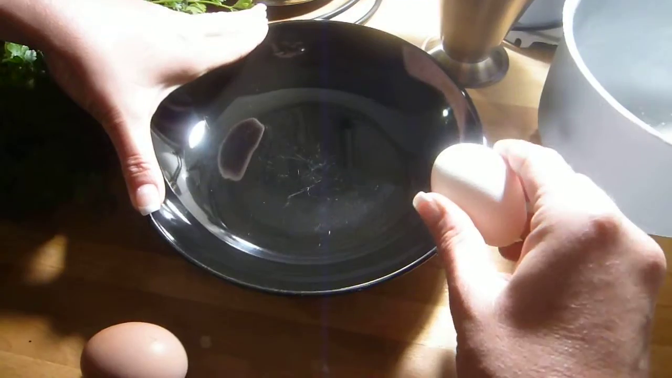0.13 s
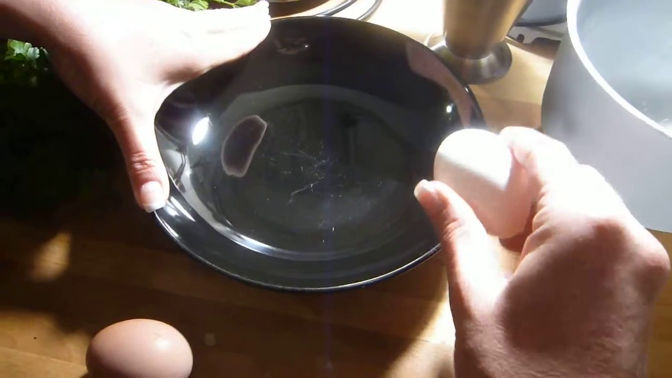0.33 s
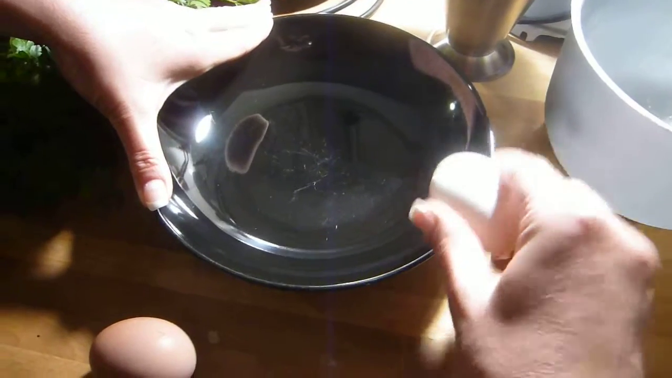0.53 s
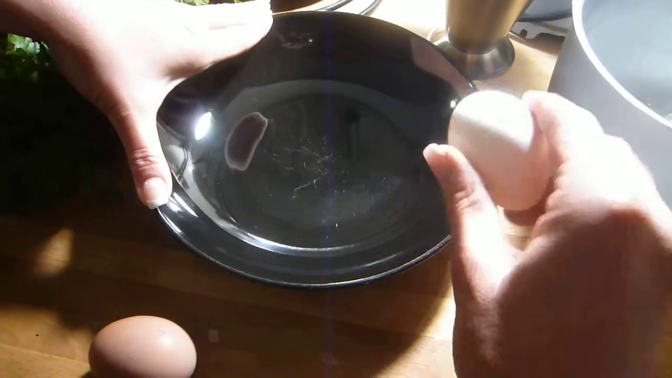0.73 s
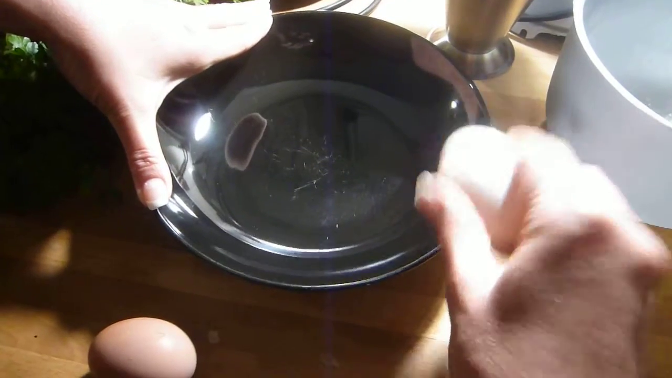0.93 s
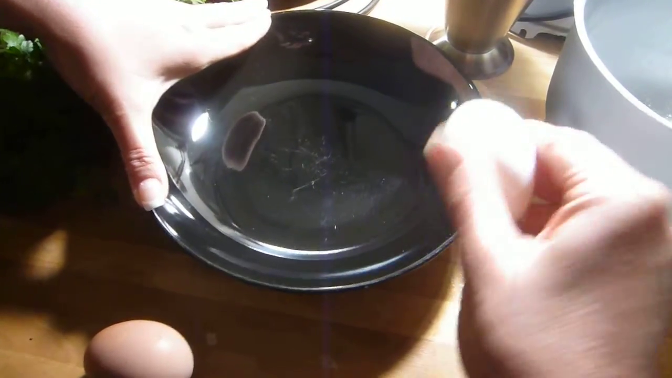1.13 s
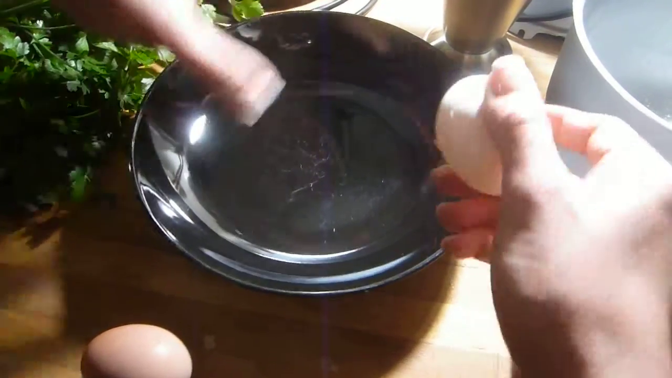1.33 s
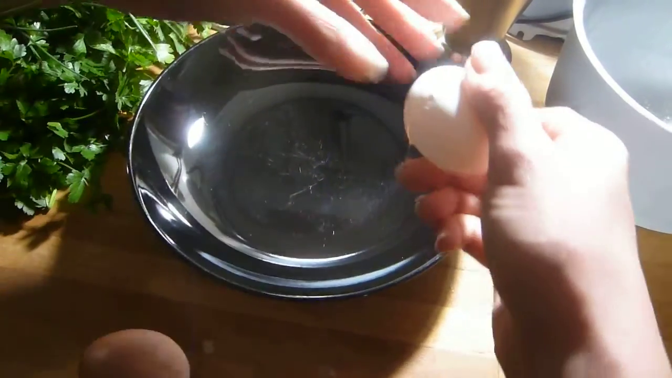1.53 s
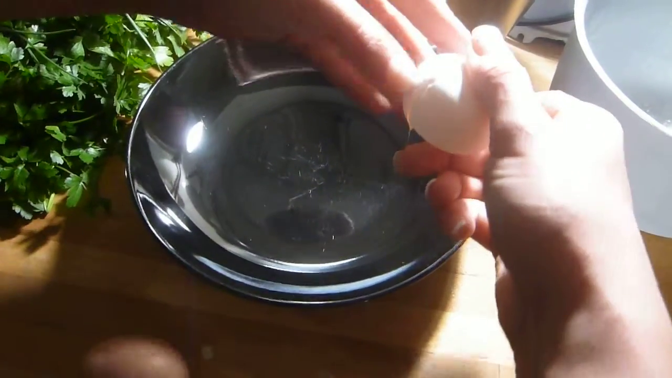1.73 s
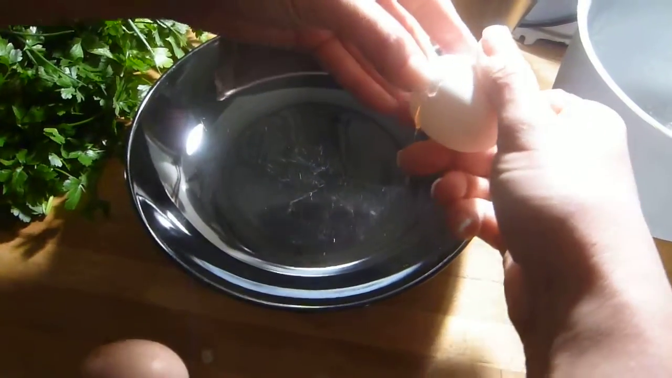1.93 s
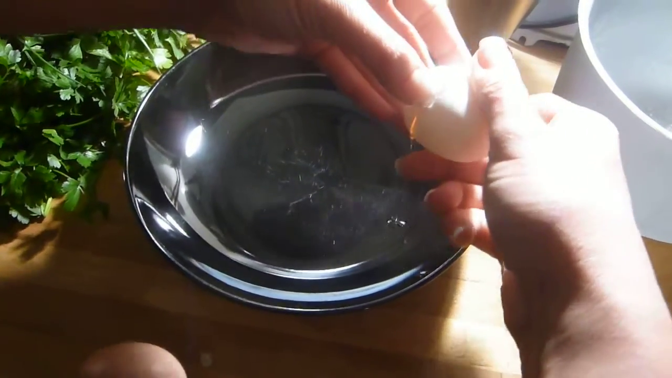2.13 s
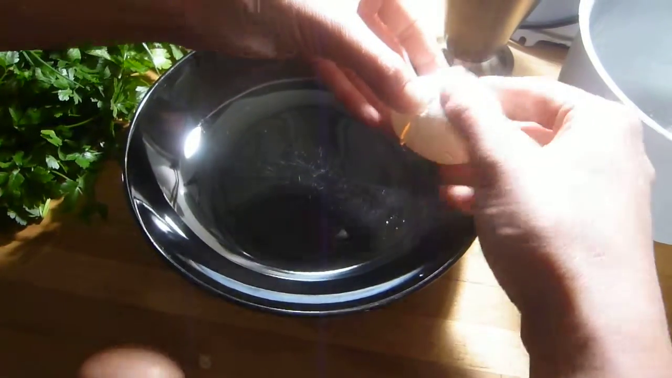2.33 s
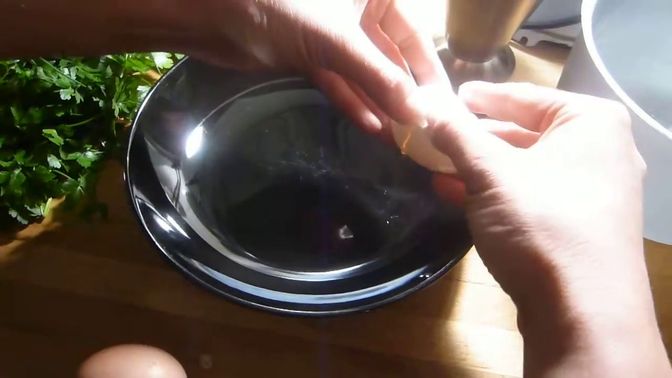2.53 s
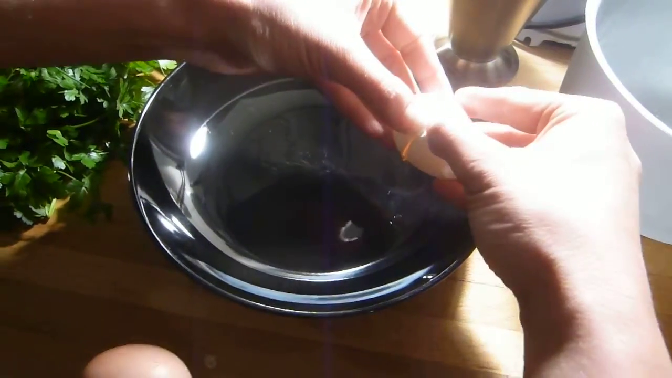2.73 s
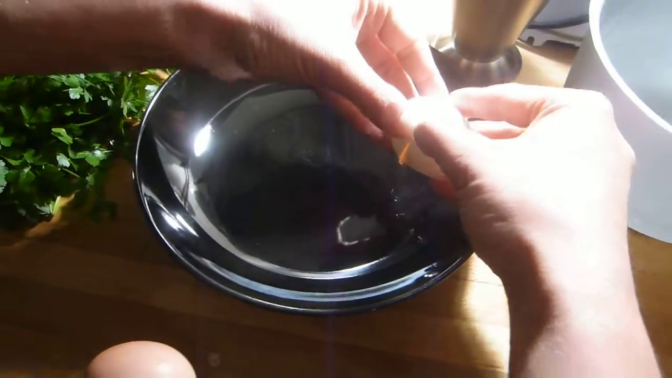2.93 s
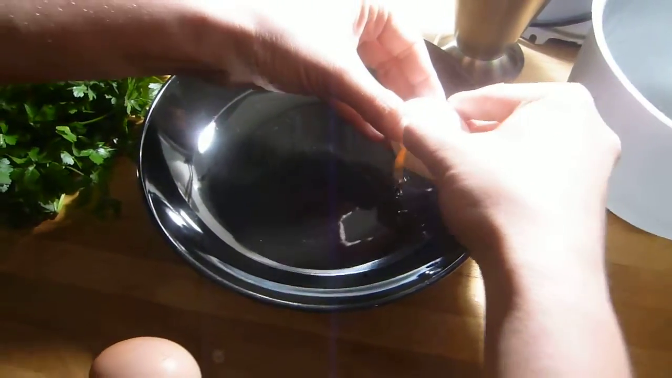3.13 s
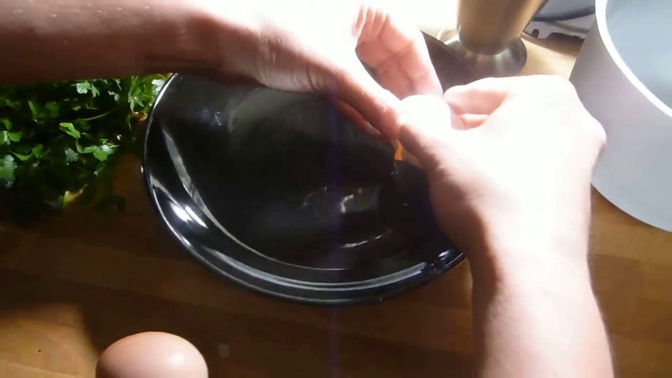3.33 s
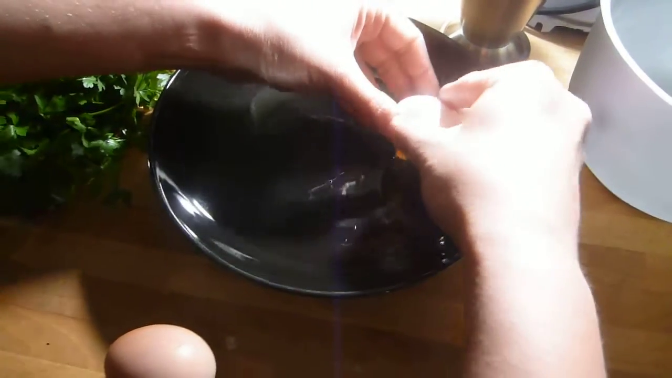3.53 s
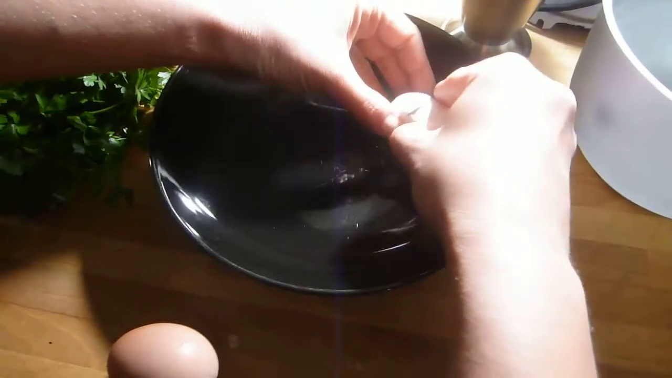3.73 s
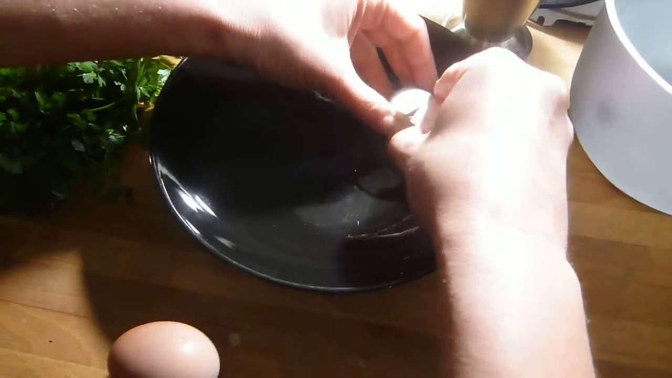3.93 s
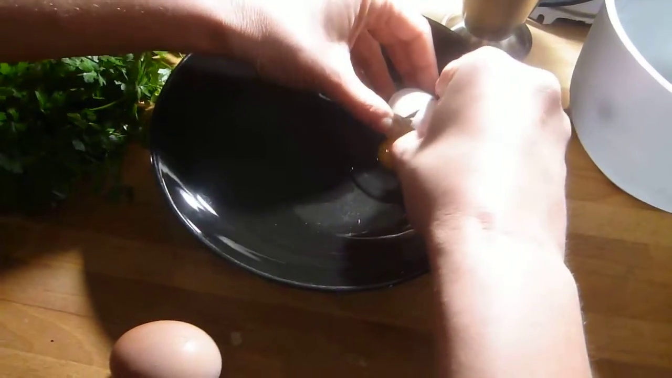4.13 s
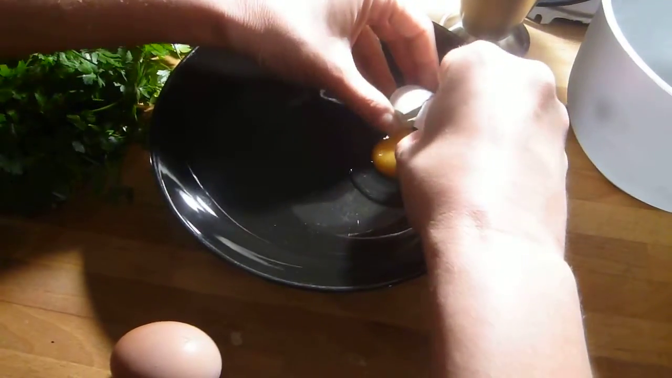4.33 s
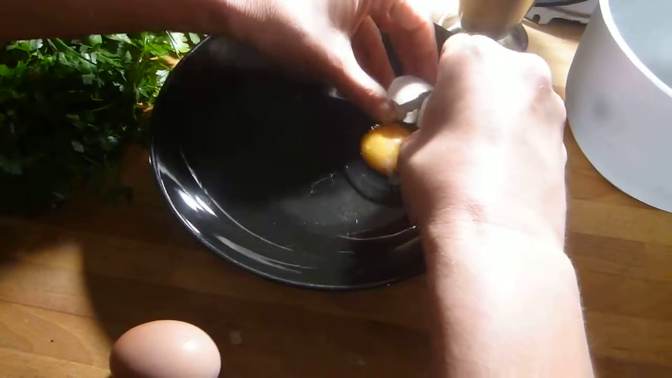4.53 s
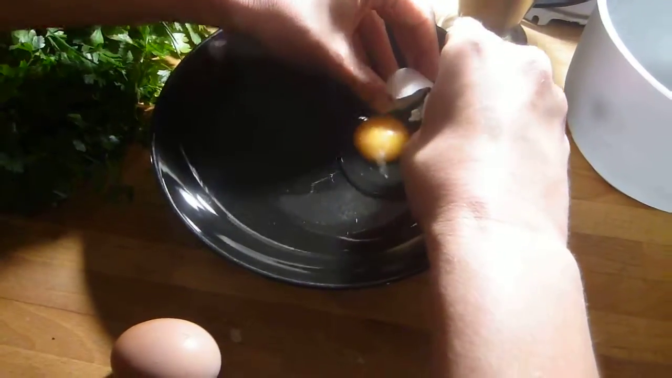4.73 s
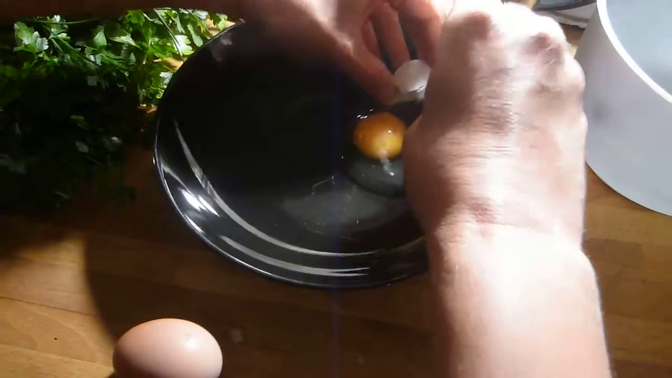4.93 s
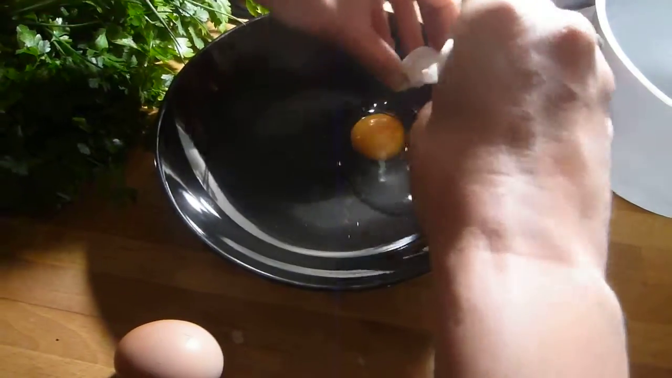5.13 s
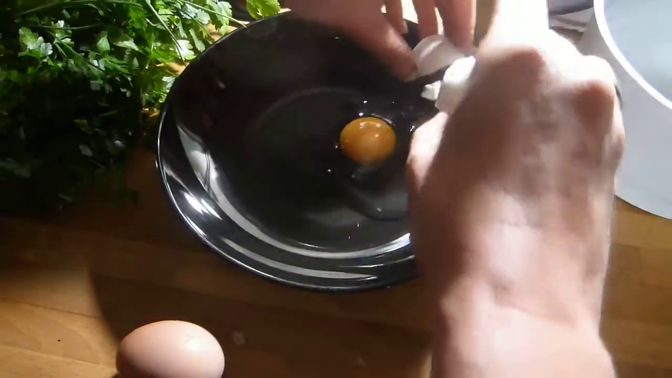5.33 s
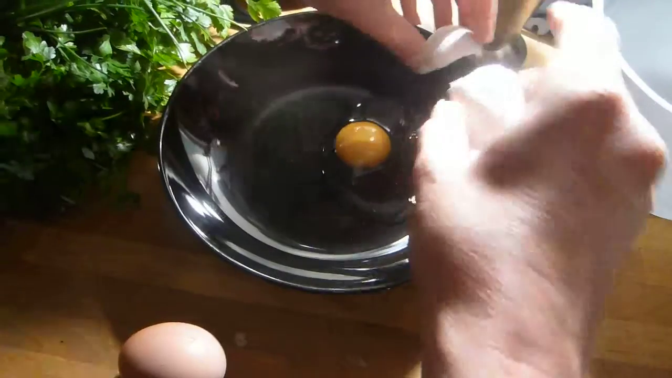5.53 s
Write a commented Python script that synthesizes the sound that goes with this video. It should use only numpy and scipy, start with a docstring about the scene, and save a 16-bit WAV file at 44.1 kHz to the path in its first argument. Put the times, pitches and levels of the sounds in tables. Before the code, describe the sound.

An egg is knocked twice on a plate's rim, then its shell crackles open and the egg slips out with faint wet sounds.

```python
"""Hiss, a faint mechanical rustle and soft handling thuds lead into two knocks of an egg on a plate's rim.
The plate stands on a wooden table: damped modes ring, and the tipped plate drops back with a dull bump.
Thumbs then break the shell open: bursts of tiny clicks excite its resonances, and a few edges ping.
The egg slides out with short wet squelches of resonant noise, among soft damped thuds of the hands.
A small camera close by adds the hiss and rustle, and overloads on the knocks."""
import sys
import numpy as np
from scipy import signal
from scipy.fft import rfft, irfft, next_fast_len
from scipy.io import wavfile

SR = 44100
rng = np.random.default_rng(int(sys.argv[2]) if len(sys.argv) > 2 else 0)


def put_to_file(sound):
    """Save the sound as 16-bit audio at rate SR, in the file named by the first command-line argument."""
    columns = np.atleast_2d(sound).T  # one column per channel
    safe = np.clip(columns, -1, 1)
    whole_steps = np.round(safe * 32767)
    wavfile.write(sys.argv[1], SR, whole_steps.astype(np.int16))


N = 245637
TIME = np.arange(N) / SR


def from_db(db):
    """Decibels to gain."""
    return 10 ** (np.asarray(db) / 20)


def rms_one(x):
    """Scale to unit rms."""
    return x / np.sqrt(np.mean(x ** 2) + 1e-20)


def at_hz(points, hz):
    """Read a table on a log-frequency axis."""
    points = np.array(points)
    return np.interp(np.log(hz + 1e-9), np.log(points[:, 0]), points[:, 1])


def add(out, start_s, sound):
    """Mix a sound in at a time."""
    start = int(round(start_s * SR))
    out[start:start + len(sound)] += sound[:N - start]


def ring(hz, t60_s):
    """One struck mode: a sine that decays by 60 dB in t60_s."""
    t = TIME[:int(2 * t60_s * SR)]
    return np.sin(2 * np.pi * hz * t) * 1000 ** (-t / t60_s)


def thud(hz, cycles):
    """A heavily damped bump whose envelope peaks after the given number of cycles, then dies."""
    age = TIME[:SR // 8] * hz / cycles
    envelope = age * np.exp(1 - age)
    return envelope * np.sin(2 * np.pi * cycles * age)


def swell(length_s):
    """A rounded rise and fall."""
    return np.sqrt(signal.windows.hann(int(length_s * SR)))


def resonate(x, hz, width_hz):
    """A two-pole resonance with gain one on top."""
    radius = np.exp(-np.pi * width_hz / SR)
    zeros = np.array([1, 0, -1]) * (1 - radius * radius) / 2
    poles = [1, -2 * radius * np.cos(2 * np.pi * hz / SR), radius * radius]
    return signal.lfilter(zeros, poles, x)


def noise(spectrum):
    """Steady noise of a given colour, rms one."""
    size = next_fast_len(N)
    hz = np.fft.rfftfreq(size, 1 / SR)
    coloured = rfft(rng.standard_normal(size)) * from_db(at_hz(spectrum, hz))
    return rms_one(irfft(coloured, size)[:N])


def drift(per_s):
    """Random values joined by straight lines, with a spread of about one."""
    return np.interp(TIME * per_s, np.arange(N), rng.standard_normal(N))


def now_and_then(per_s):
    """Times that follow each other at uneven gaps."""
    times = np.cumsum(rng.gamma(3, size=300)) / (3 * per_s)
    return times[times < N / SR]


# how long the kitchen rings on in each register: pitch_hz, t60_s
ROOM_DECAY = [(100, 0.7), (300, 0.33), (1000, 0.32), (3000, 0.18), (8000, 0.047)]


def kitchen(x, wet_db, gap_s, dull_hz):
    """Direct sound plus a duller diffuse tail in which the treble dies first."""
    t, tail = TIME[:SR], 0
    edges = np.geomspace(60, 9000, 11)
    for low, high in zip(edges, edges[1:]):
        hz = np.sqrt(low * high)
        band_filter = signal.butter(2, [low, high], "band", fs=SR, output="sos")
        band = signal.sosfilt(band_filter, rng.standard_normal(SR))
        decay = 1000 ** (-t / at_hz(ROOM_DECAY, hz))
        tail = tail + band * decay / np.linalg.norm(decay) / np.hypot(1, hz / dull_hz)
    tail = tail * np.minimum(t / gap_s, 1)  # fades in behind the direct sound
    return x + from_db(wet_db) * signal.fftconvolve(x, tail)[:N]


# colour of the camera's steady hiss: pitch_hz, relative level_db (per Hz)
HISS_COLOUR = [(10, -28), (30, 3), (60, 4.5), (140, 3.5), (260, -3.5), (480, -4.5), (900, -14),
               (1400, -12.5), (1900, -15), (2600, -19.5), (3500, -21.5), (7300, -24.5), (7900, -29),
               (8400, -33.5)]


def hiss(level_db):
    """The camera's own steady bed: coloured noise."""
    return from_db(level_db) * noise(HISS_COLOUR)


# colour of the mechanical rustle: pitch_hz, relative level_db (per Hz)
RUSTLE_COLOUR = [(300, -49), (550, -5.5), (890, 4), (1010, -4), (1150, 4.5), (1290, -7.5), (1550, -2.5),
                 (1680, -12), (1900, -5), (2250, -9.5), (2600, -20), (4000, -22.5), (8000, -66.5)]
# strength of the rustle's spurts along the scene: time_s, level_db
SPURT_STRENGTH = [(0.15, -47.5), (0.75, -55), (2.0, -50.5), (2.85, -55), (3.4, -49), (3.8, -58.5),
                  (4.15, -46), (4.5, -51.5), (5.0, -52.5), (5.57, -49.5)]
SPURTS_PER_S, SPURT_S, SPURT_SPREAD_DB = 18, 0.012, 0.8  # rate, typical length, spread of strength


def rustle(idle_db, flutter_db, flutter_per_s, grain_db, attack_s):
    """The camera's mechanism whispers unevenly and comes in grainy spurts that start abruptly."""
    gain = from_db(idle_db + flutter_db * np.tanh(drift(flutter_per_s)))
    t = TIME[:SR // 8]
    for start_s in now_and_then(SPURTS_PER_S):
        typical_db = np.interp(start_s, *np.transpose(SPURT_STRENGTH))
        level_db = typical_db + SPURT_SPREAD_DB * rng.standard_normal()
        length_s = SPURT_S * 2 ** rng.uniform(-1.02, 1)
        spurt = np.minimum(t / attack_s, 1) * np.exp(-(t / length_s) ** 2)
        add(gain, start_s, from_db(level_db) * spurt)
    grain = from_db(grain_db * drift(500))
    return gain * grain * noise(RUSTLE_COLOUR)


# soft thuds of the hands and the egg: start_s, level_db, pitch_hz
SOFT_THUDS = [(0.071, -29, 167), (0.127, -30, 137), (2.238, -34.5, 141), (2.4786, -24, 240),
              (3.083, -24.5, 172), (3.123, -30.5, 179), (3.2313, -27, 148), (3.248, -23, 154),
              (3.413, -33, 153), (3.586, -37.5, 160), (4.080, -32, 204), (4.721, -32.5, 140),
              (5.01, -32.5, 224), (5.401, -29.5, 230)]
# the plate humming faintly as a hand leans on it: start_s, level_db, length_s
PLATE_LEANS = [(2.677, -49, 0.071), (4.691, -48, 0.093)]
PLATE_HUM_HZ = 399.3
SETTLE_S, SETTLE_DB, SETTLE_PITCH = 0.0118, -12.5, 0.63  # flesh settling: delay, level, pitch ratio
FIDGETS_PER_S, FIDGET_DB, FIDGET_HZ = 3, -42, 150  # small shifts of the grip: rate, typical level, pitch


def hands():
    """Fingers shift and the soft egg gives way: dull, short thuds, and a faint hum of the plate."""
    out = np.zeros(N)
    fidgets = []
    for start_s in now_and_then(FIDGETS_PER_S):
        level_db = FIDGET_DB + 2 * rng.standard_normal()
        fidgets.append((start_s, level_db, FIDGET_HZ * 2 ** rng.uniform(-0.51, 0.45)))
    for start_s, level_db, hz in SOFT_THUDS + fidgets:
        add(out, start_s, from_db(level_db) * thud(hz, cycles=0.41))
        settling = thud(hz * SETTLE_PITCH, cycles=0.42)
        add(out, start_s + SETTLE_S, from_db(level_db + SETTLE_DB) * settling)
    for start_s, level_db, length_s in PLATE_LEANS:
        shape = swell(length_s)
        hum = np.sin(2 * np.pi * PLATE_HUM_HZ * TIME[:len(shape)])
        add(out, start_s, from_db(level_db) * shape * hum)
    return out


# the egg slipping wetly out of the shell: start_s, level_db, length_s, pitch_hz
WET_SLIPS = [(3.909, -43, 0.0066, 960), (4.296, -38, 0.016, 925), (4.337, -43.5, 0.025, 940),
             (4.382, -51, 0.057, 950), (4.943, -43.5, .012, 910), (5.075, -46, 0.02, 1100)]


def squelches(width_hz):
    """Sticky egg white tears and briefly rings the hollow of the shell."""
    out = np.zeros(N)
    for start_s, level_db, length_s, hz in WET_SLIPS:
        shape = swell(length_s)
        tearing = rng.standard_normal(SR // 10)
        for _ in range(2):  # two passes sharpen the resonance
            tearing = resonate(tearing, hz, width_hz)
        # the end of the burst is used, where the resonance has built up
        add(out, start_s, from_db(level_db) * shape * rms_one(tearing[-len(shape):]))
    return out


# free edges of shell ringing as they let go: start_s, level_db, pitch_hz, t60_s
SHELL_EDGES = [(3.0814, -20, 914, 0.027), (3.6171, -38, 3840, 0.035), (3.6173, -41, 4980, 0.022)]


def shards():
    """Broken edges give very short pings."""
    out = np.zeros(N)
    for start_s, level_db, hz, t60_s in SHELL_EDGES:
        add(out, start_s, from_db(level_db) * ring(hz, t60_s))
    return out


# resonances of the shell held in the fingers: pitch_hz, width_hz, relative level_db
SHELL_MODES = [(396, 33, 4.5), (650, 85, 2.5), (948, 103, 6.5), (1402, 165, 4.5), (1916, 180, 3.5),
               (2970, 610, 2.5), (4020, 350, 1.5), (5040, 620, -1), (7240, 1500, -14.5)]


def shell(fractures, level_db, crumble_share, scatter_db, flakes_db, flakes_s, flakes_per_s):
    """A fracture is a click, a spray of tinier ones and late flakes; each rings the shell differently."""
    out, t = np.zeros(N), TIME[:SR // 10]
    middle_hz = np.median(np.array(SHELL_MODES)[:, 0])
    for start_s, fracture_db, crumble_s, tilt_db in fractures:
        spray = rng.laplace(size=len(t)) * np.exp(-t / crumble_s)
        flake_sizes = rng.standard_normal(len(t))
        flake_hits = rng.random(len(t)) < flakes_per_s / SR
        flakes = flake_sizes * flake_hits * np.exp(-t / flakes_s)
        force = crumble_share * spray / np.linalg.norm(spray) + from_db(flakes_db) * flakes
        force[0] += 1  # the first click
        for m, (hz, width_hz, mode_db) in enumerate(SHELL_MODES):
            tilted_db = mode_db + tilt_db * np.log2(hz / middle_hz)
            gain_db = level_db + fracture_db + tilted_db + scatter_db * rng.standard_normal()
            add(out, start_s, (-1) ** m * from_db(gain_db) * resonate(force, hz, width_hz))
    return out


# the shell snapping under the fingers: start_s, relative level_db, crumble_s, tilt_db (per octave)
FINGER_SNAPS = [(0.5516, -37.5, .0011, -1), (2.0759, -45.5, 0.0023, 5.5), (3.063, -32, 0.002, -7),
                (3.0681, -18, 0.0014, -1.3), (3.0812, -13, .0018, -1.5), (3.0862, -20, .0036, -4),
                (3.0943, -18.5, 0.0013, -3.5), (3.1266, -21.5, 0.0031, -2.2), (3.5765, -39, 0.00088, 2.5),
                (3.591, -38, 0.0038, -5), (3.6164, -26, 0.0092, -2), (5.2220, -36, 0.0015, -2)]
RUN_ON_S, RUN_ON_LOSS_DB = .012, 18.5  # mean gap between running steps, loss at the first step


def running_cracks(count):
    """Every snap is followed by weaker ones as the crack runs on in smaller steps."""
    gaps = RUN_ON_S * rng.uniform(.5, 1.5, (len(FINGER_SNAPS), count))
    after = []
    for (start_s, snap_db, crumble_s, tilt_db), row in zip(FINGER_SNAPS, gaps):
        for k, delay_s in enumerate(np.cumsum(row)):
            level_db = snap_db - RUN_ON_LOSS_DB * np.sqrt(k + 1)
            after.append((start_s + delay_s, level_db, crumble_s, tilt_db))
    return FINGER_SNAPS + after


def snaps():
    """Thumbs break the shell: crisp fractures with plenty of flakes."""
    return shell(running_cracks(count=3), level_db=14, crumble_share=1.1, scatter_db=.4,
                 flakes_db=-23, flakes_s=.011, flakes_per_s=2000)


# the shell caving in against the rim: start_s, relative level_db, crumble_s, tilt_db (per octave)
RIM_CRUSHES = [(0.4852, -2, .0012, -3.5), (0.4872, 0, 0.002, -8), (0.9865, -11.5, .002, -7.5),
               (0.9895, -11, 0.0054, 1), (0.9940, -14, .0015, -1)]


def crushes():
    """The shell caves in on the rim: strong fractures with very faint flakes."""
    return shell(RIM_CRUSHES, level_db=7.5, crumble_share=1.0, scatter_db=0.5,
                 flakes_db=-49.5, flakes_s=0.0071, flakes_per_s=1000)


# two knocks and the drop: start_s, body_db, thud_db, thud_hz, rebound_s (delay after the blow),
# rebound_db (relative to the thud), contact_s, damp_s (time for the hand to damp it)
PLATE_BLOWS = [(0.4862, 0, -0.5, 698, 0.019, -4.5, 0.00022, 0.22),
               (0.9897, -3, -1.5, 573, 0.015, -3.5, 0.001, 0.19),
               (1.1960, -0.5, -24.5, 502, 0.00764, 9.5, 0.0031, 0.18)]
# plate and table together, each blow landing elsewhere: pitch_hz, t60_s,
# then level_db (relative to body_db) in the first knock, second knock and drop
BODY_MODES = [(48, 0.88, -31.5, -33, -52), (63.5, .6, -40, -64, -60), (109.2, 0.84, -39.5, -46.5, -40.5),
              (134.4, 0.54, -36.5, -25, -29.5), (161.6, 0.38, -31, -24.5, -33.5),
              (204, 0.71, -23.5, -24, -33), (191.6, 0.22, -20.5, -8.5, -32.5), (232, 0.39, -15.5, -17, -20),
              (252.4, 0.55, -26.5, -23, -30.5), (276, 0.57, -17, -25.5, -25), (309, 1, -31.5, -23, -33.5),
              (331, 0.6, -24, -20.5, -29.5), (400.6, 0.19, -21, -6, -18), (426.2, 0.16, -10, -8, -17.5),
              (499, 0.15, -28, -46, -43), (495.5, 0.15, -16.5, -16, -37), (606, 1, -52.5, -52, -39.5),
              (609, 0.27, -17, -17.5, -41.5), (614, 0.067, -8.5, -47, -17.5), (671, 0.24, -17.5, -33, -39),
              (750, 0.029, -26, -19, -38), (785, 0.048, -17, -15.5, -27), (850, 0.16, -29, -40, -53),
              (952.6, 0.22, -23.5, -23.5, -45.5), (1062, 0.1, -25, -23.5, -45.5),
              (1168, 0.06, -20, -19, -71), (1248, 0.037, -6, -14.5, -78), (1442, 0.11, -31, -40, -71)]
# the plate's rim, struck only by the egg: pitch_hz, t60_s, level_db in first and second knock
RIM_MODES = [(1796, 0.059, -44, -25.5), (2080, 0.3, -33.5, -39.5), (2134, 0.047, -20.5, -19),
             (3015, 0.19, -39, -49.5), (4070, 0.16, -45.5, -47.5), (5200, 0.15, -58, -51.5)]


def plate(rim_lead_s):
    """Each blow thuds, rebounds, and sets the plate and the table ringing until the hand stills them."""
    out, t = np.zeros(N), TIME[:2 * SR]
    for k, blow in enumerate(PLATE_BLOWS):
        start_s, body_db, thud_db, thud_hz, rebound_s, rebound_db, contact_s, damp_s = blow
        onset = 1 - np.exp(-(t / contact_s) ** 2)
        grip = onset * np.exp(-(t / damp_s) ** 2)
        for m, (hz, t60_s, *level_db) in enumerate(BODY_MODES):
            # neighbouring modes swing in opposite senses, so the boom builds up over a few ms
            mode = (-1) ** m * from_db(body_db + level_db[k]) * ring(hz, t60_s)[:len(t)]
            add(out, start_s, mode * grip[:len(mode)])
        bump = from_db(thud_db) * thud(thud_hz, cycles=0.48)
        add(out, start_s, bump)
        add(out, start_s + rebound_s, from_db(rebound_db) * bump)
    for hz, t60_s, *levels_db in RIM_MODES:
        for blow, level_db in zip(PLATE_BLOWS, levels_db):
            add(out, blow[0] - rim_lead_s, from_db(level_db) * ring(hz, t60_s))
    return out


def scene():
    """Plate, shell and hands in the kitchen, over the camera's own noise."""
    blows = crushes() + plate(rim_lead_s=0.000904)
    breaking = snaps() + shards()
    knocks = kitchen(blows, wet_db=-8.0, gap_s=0.003, dull_hz=1550)
    cracks = kitchen(breaking, wet_db=-6.0, gap_s=0.0021, dull_hz=4940)
    handling = kitchen(hands() + squelches(width_hz=270), wet_db=-10.0, gap_s=0.0032, dull_hz=2990)
    whisper = rustle(idle_db=-64, flutter_db=9, flutter_per_s=50, grain_db=1.5, attack_s=.0015)
    floor = hiss(level_db=-52) + whisper
    return (knocks + cracks + handling + floor)[None]


CUTOFF_HZ, TOP_HZ, CLIP_LEVEL = 8425, 15800, 0.77  # treble cut, final cut, overload (full scale = 1)


def record(dry):
    """The microphone's treble rolls off and is cut; overloading knocks spill a little above the cut."""
    mellow = signal.sosfilt(signal.butter(6, 7900, fs=SR, output="sos"), dry)
    narrow = signal.sosfilt(signal.ellip(10, .1, 70, CUTOFF_HZ, fs=SR, output="sos"), mellow)
    clipped = np.clip(narrow, -CLIP_LEVEL, CLIP_LEVEL)
    softened = signal.sosfilt(signal.butter(3, 8200, fs=SR, output="sos"), clipped)
    return signal.sosfilt(signal.ellip(10, .1, 70, TOP_HZ, fs=SR, output="sos"), softened)


dry = scene()
out = record(dry)
put_to_file(out)
```